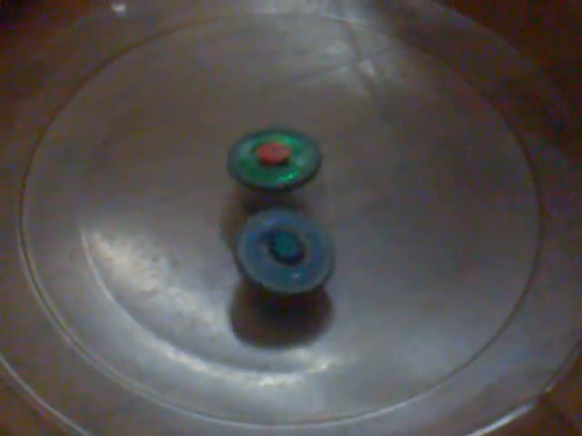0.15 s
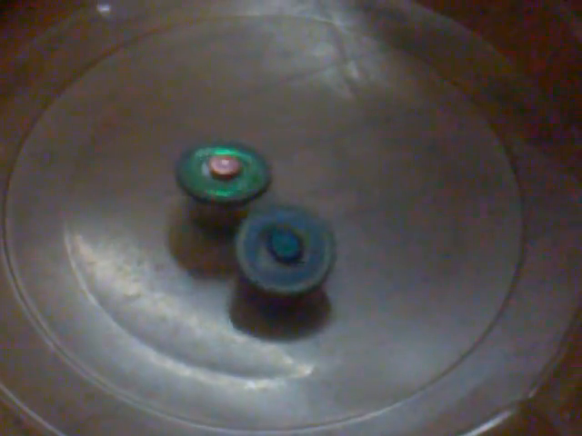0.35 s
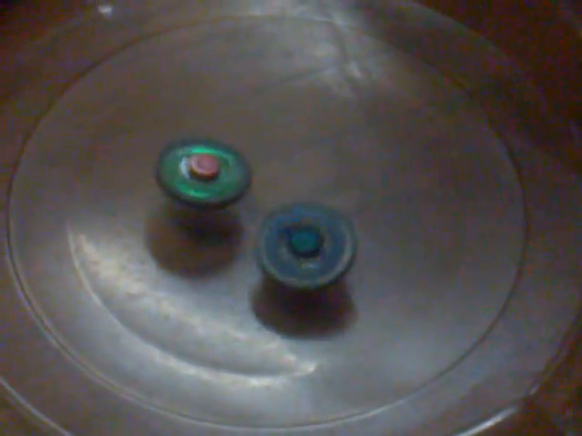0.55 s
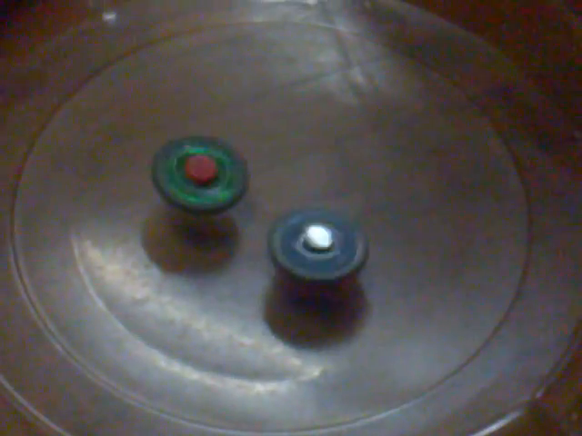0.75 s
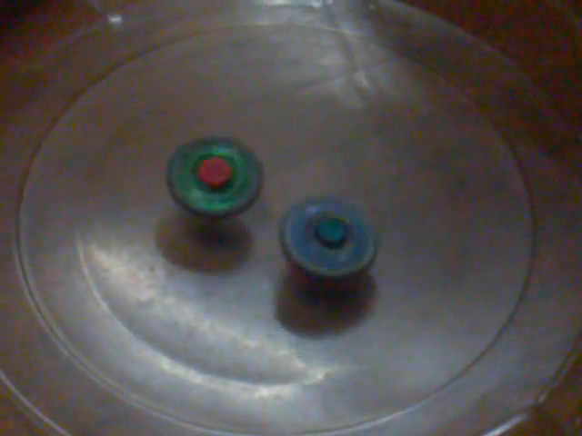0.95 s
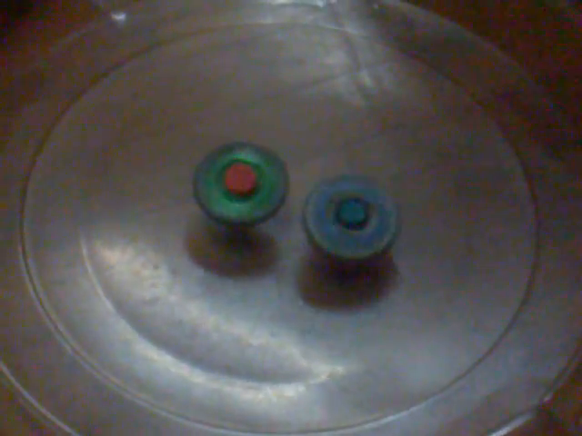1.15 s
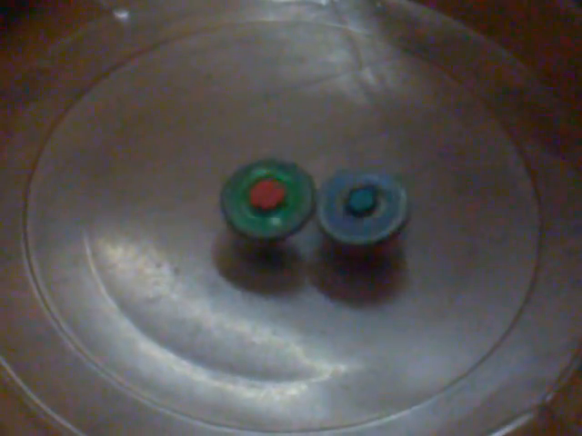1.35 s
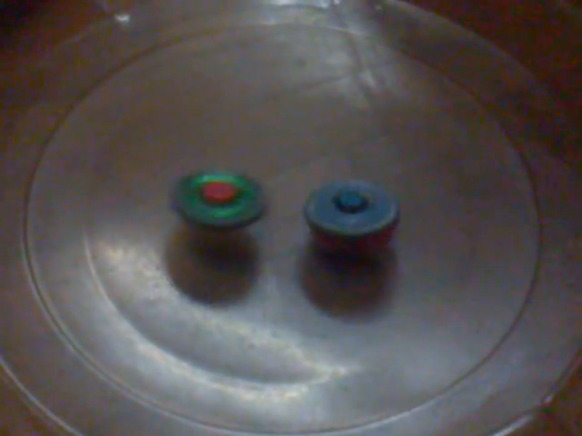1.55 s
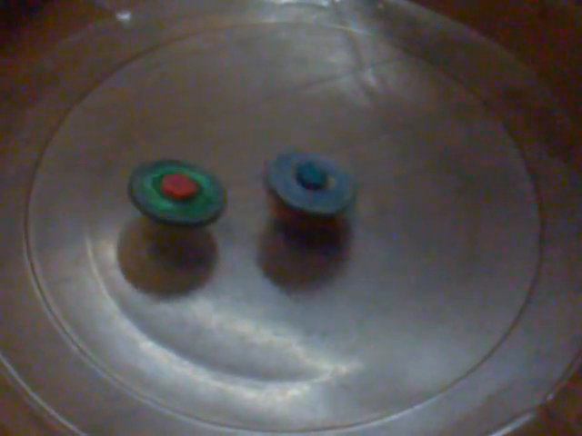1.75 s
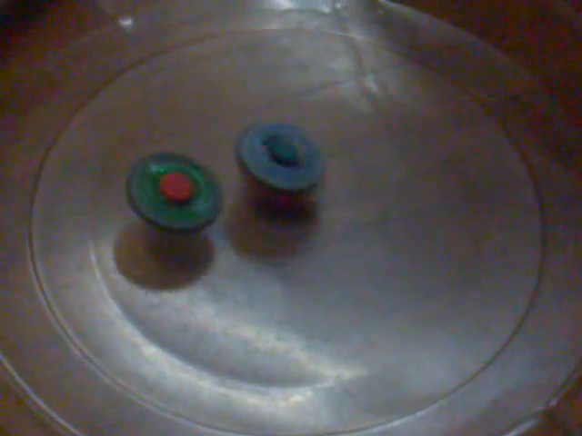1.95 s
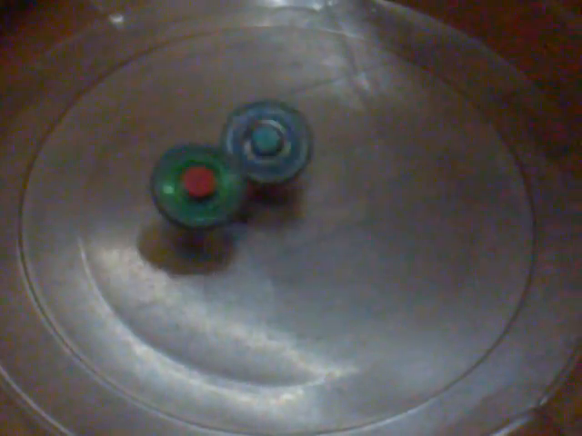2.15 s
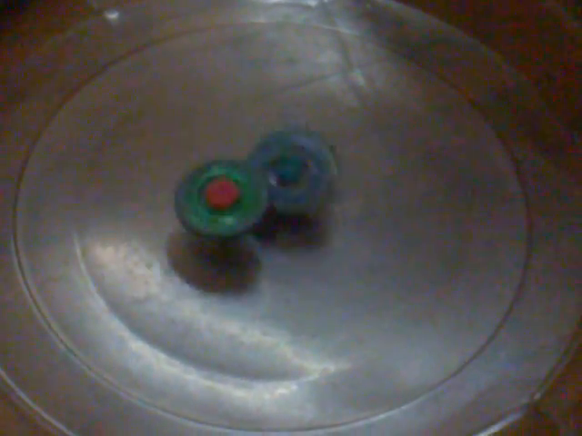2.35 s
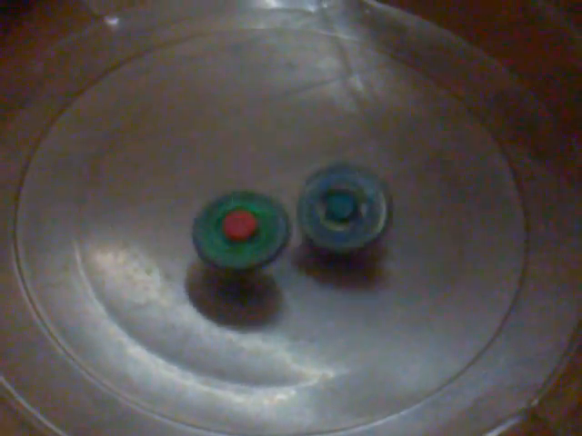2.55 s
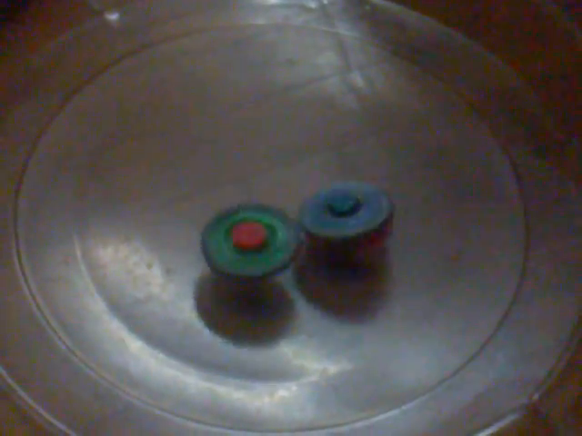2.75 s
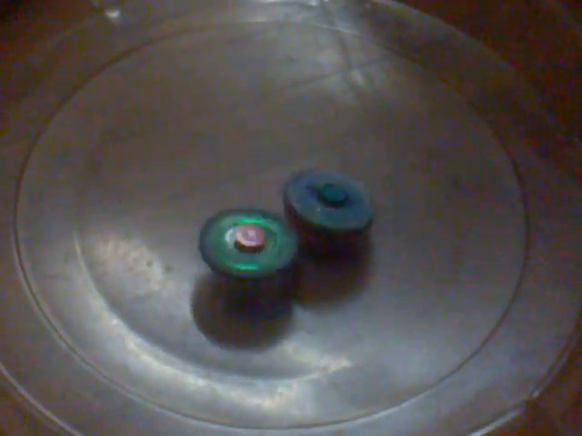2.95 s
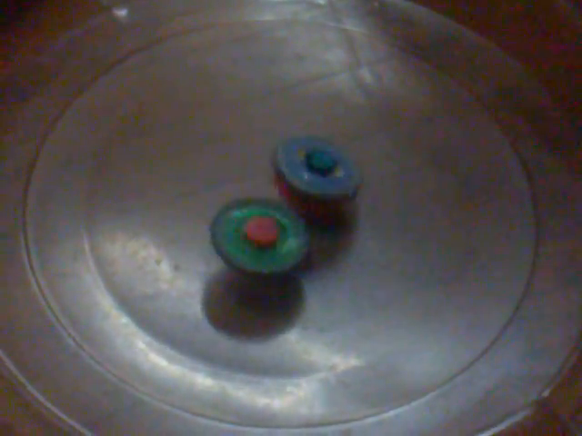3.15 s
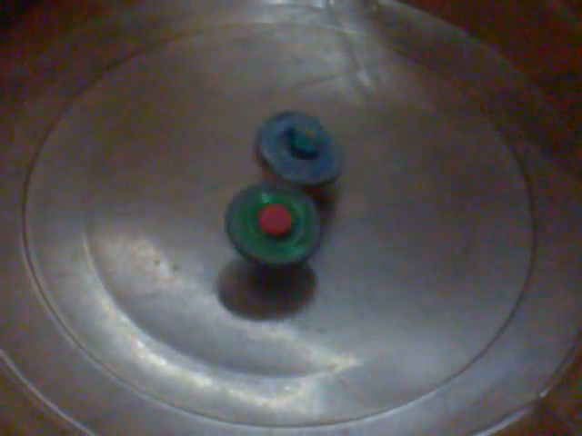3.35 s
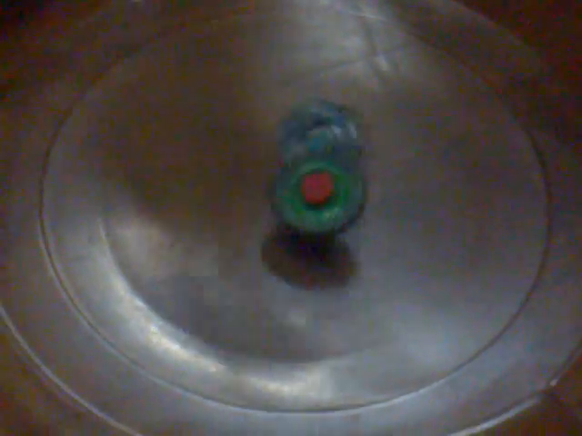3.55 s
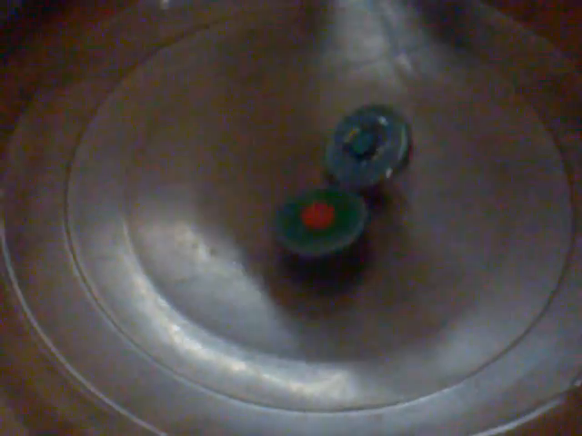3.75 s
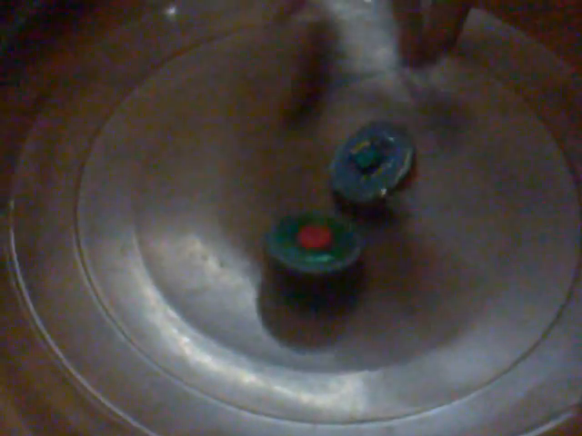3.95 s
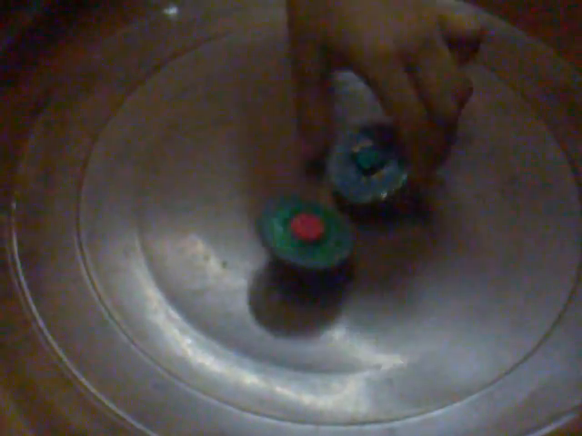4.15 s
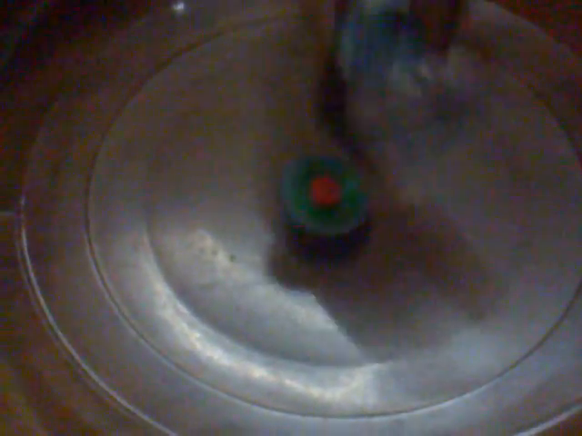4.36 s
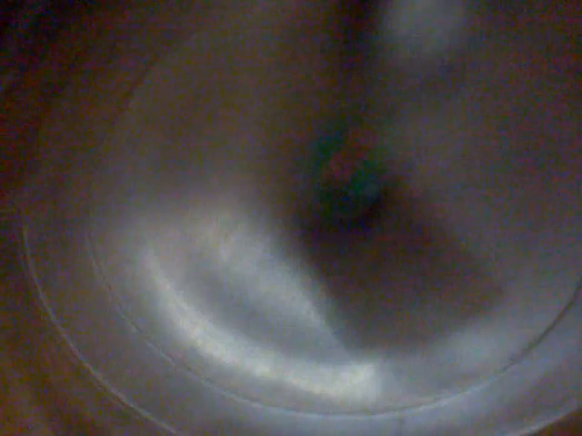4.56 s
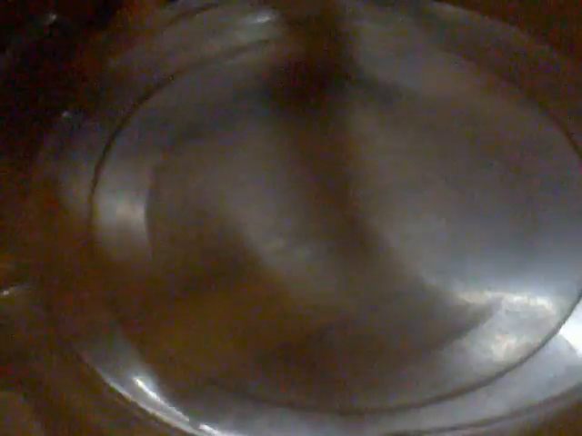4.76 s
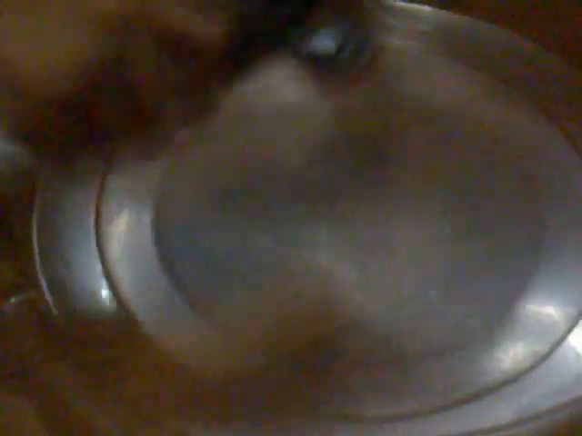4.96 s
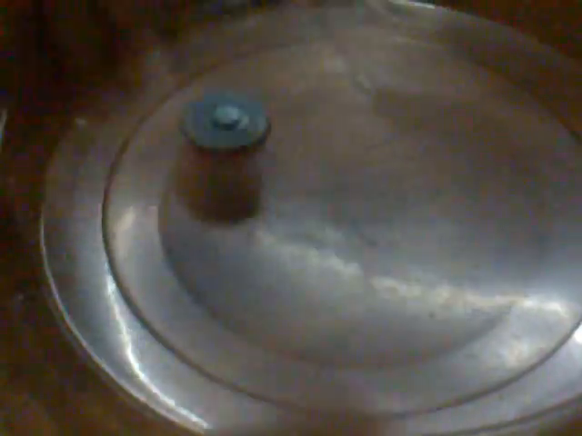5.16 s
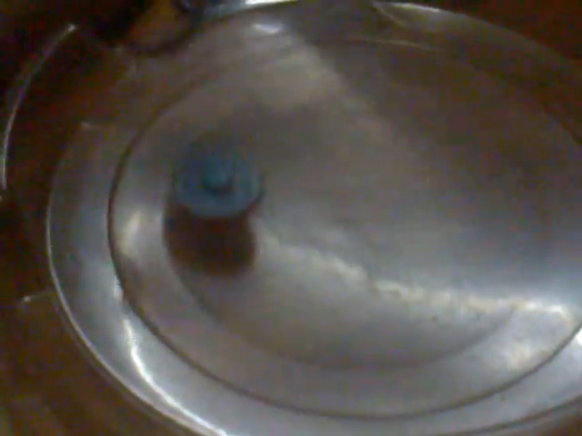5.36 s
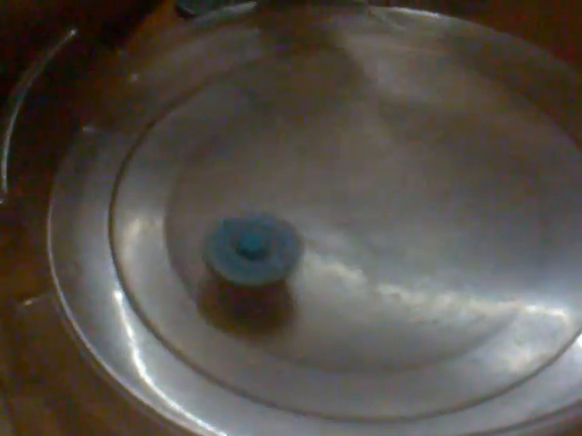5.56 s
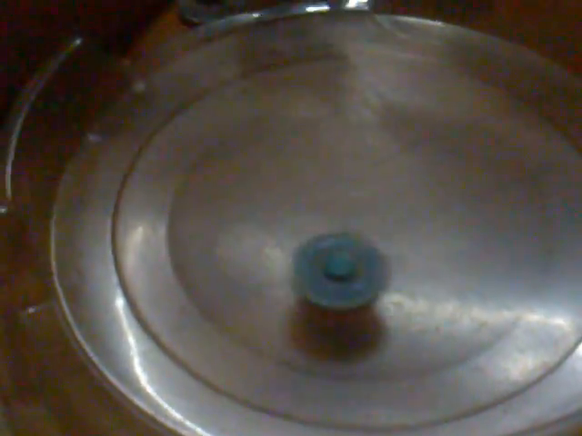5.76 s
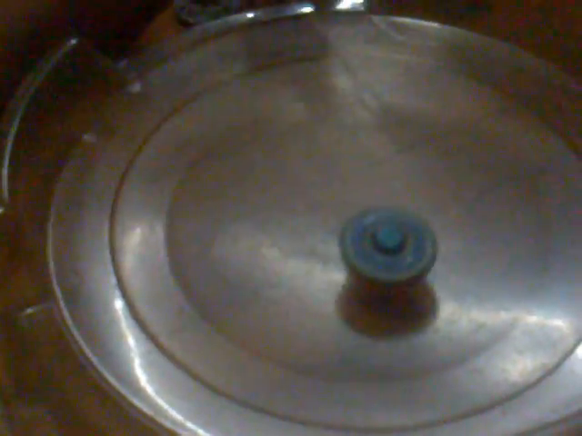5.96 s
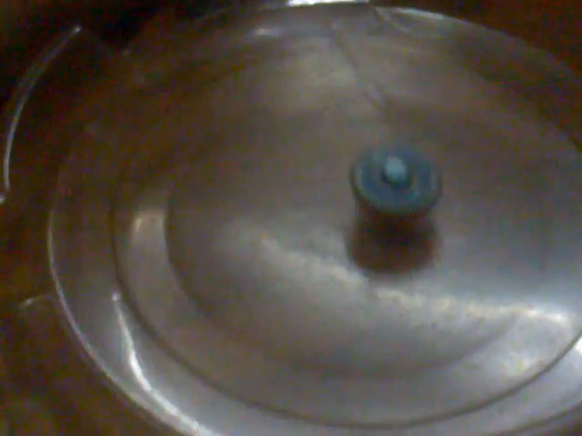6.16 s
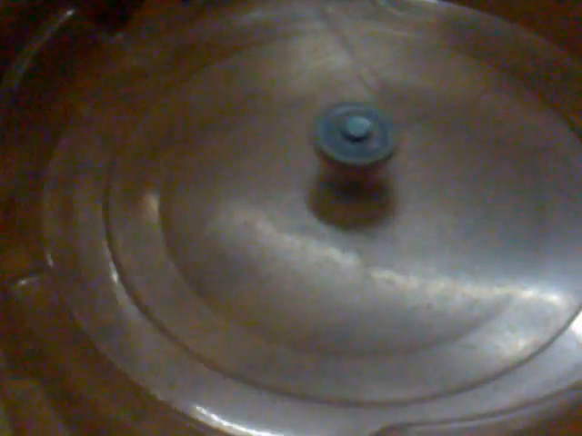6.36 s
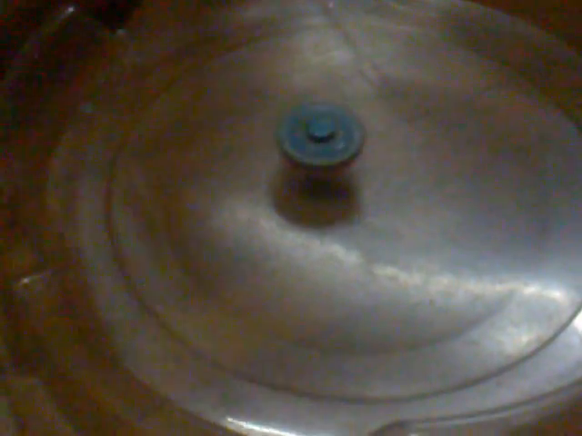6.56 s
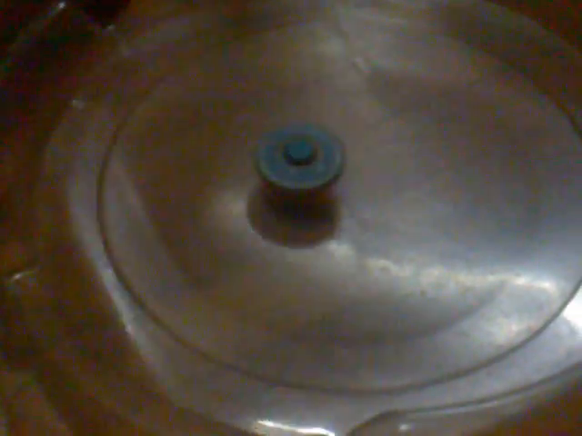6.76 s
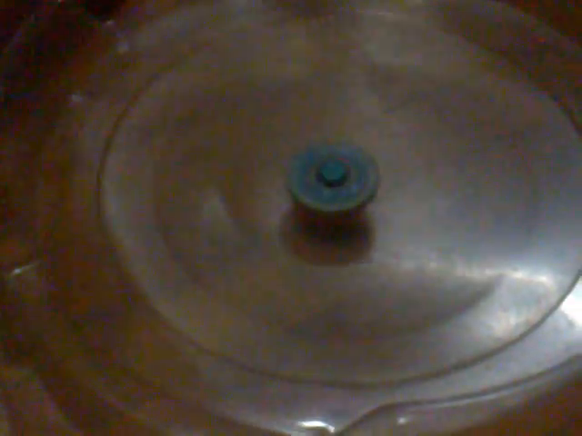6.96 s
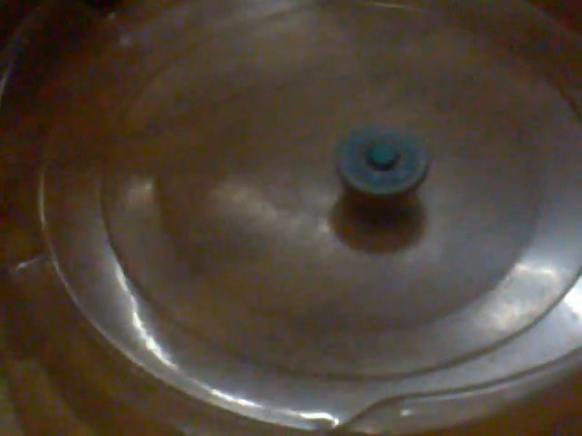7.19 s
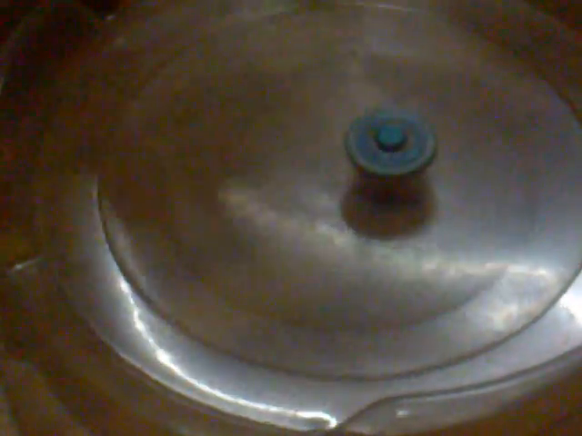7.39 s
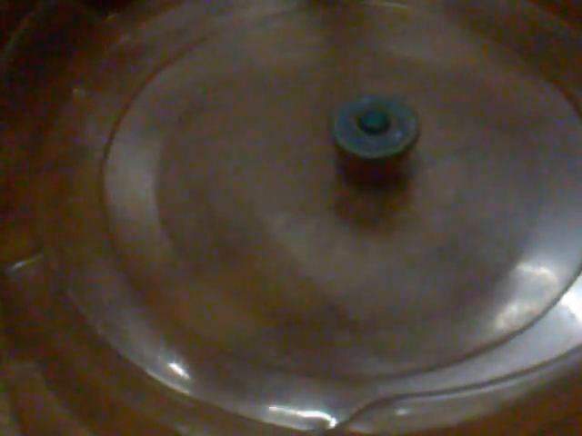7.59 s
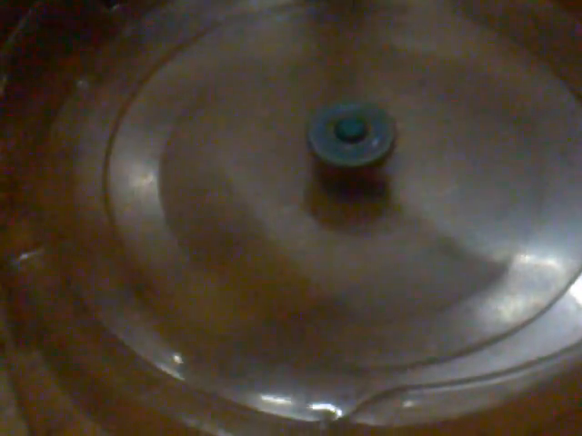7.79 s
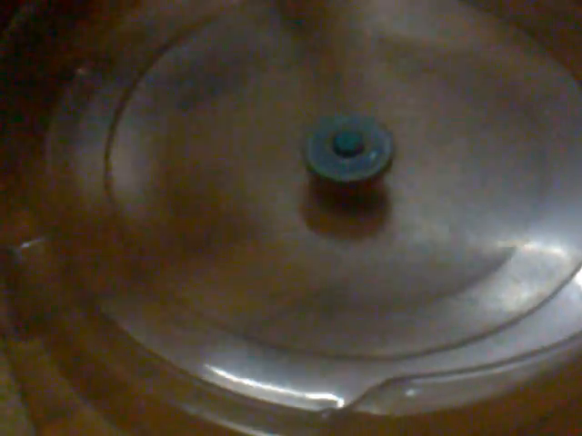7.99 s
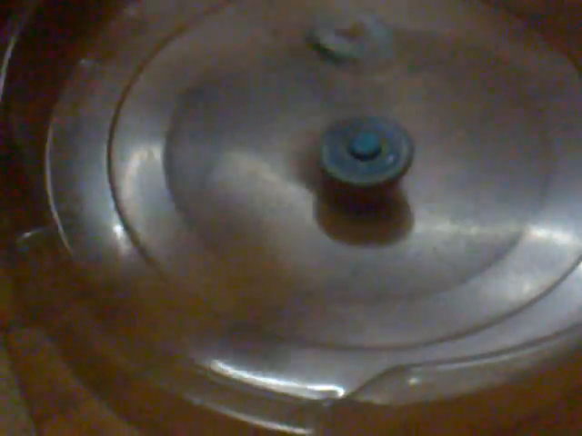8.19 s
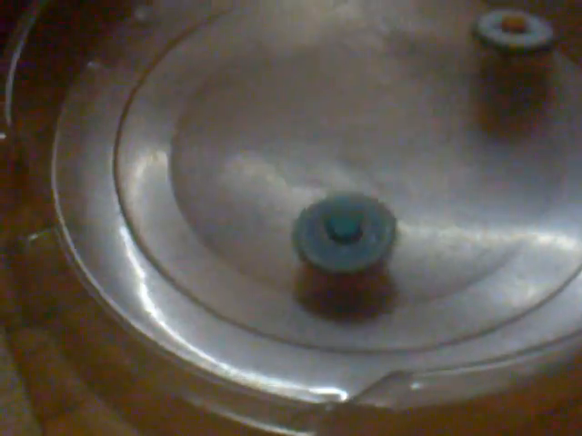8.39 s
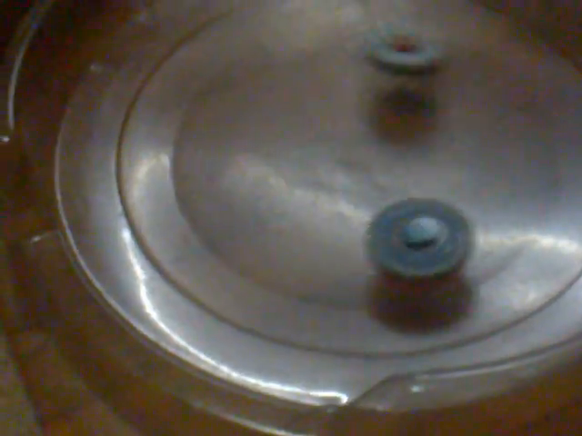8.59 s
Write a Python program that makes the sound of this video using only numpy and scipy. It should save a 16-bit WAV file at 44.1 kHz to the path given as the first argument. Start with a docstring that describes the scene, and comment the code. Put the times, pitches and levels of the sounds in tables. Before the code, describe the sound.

Two plastic spinning tops tick and scrape faintly around a wide bowl in a quiet room, heard from just above. At about 1.5 seconds they clash in a quick flurry of sharp clacks that trails into light taps. Another flurry with harder scraping comes at 2.4 seconds, then scattered ticks, and a third at 3.6. A hand bumps in with a dull thud at 4.5, followed by a brief silence.

At 5.1 seconds a ripcord gives a short, loud rasp through a launcher. A top lands, bounces rapidly and settles into a faint low hum and whirr. Small plastic clicks sound around 5.8, 6.4 and 7 seconds as the launcher is reloaded. At 8.1 a second rasp throws in another top, which lands, strikes with a loud crack and bright metallic ping near 8.4, and clatters around the bowl.

```python
"""A wide bowl in a quiet room, one microphone just above it. Two tired spinning tops scrape round and clash
rim on rim in quick flurries until a hand bumps in to pick one out. After a short silence a ripcord rasps
over a launcher's gear and throws a top in: it lands, bounces and hums on its off-centre tip while the
launcher clicks and is loaded again. A second top is launched, lands, strikes with a bright ping of its
metal weight ring and clatters round the bowl."""
import sys
import numpy as np
from scipy import signal
from scipy.fft import rfft, irfft
from scipy.io import wavfile
from scipy.ndimage import uniform_filter1d, minimum_filter1d

SR = 44100
rng = np.random.default_rng(int(sys.argv[2]) if len(sys.argv) > 2 else 0)


def digitize_waveform(pressure):
    """Quantize a signal to 16-bit integers and store it at the path in sys.argv[1].

    Rows of a 2-D input are taken as channels; values are limited to [-1, 1].
    """
    field = np.atleast_2d(pressure).T
    bounded = np.clip(field, -1, 1)
    quanta = np.round(bounded * 32767).astype(np.int16)
    wavfile.write(sys.argv[1], SR, quanta)


N = 380583
PAUSE_S = (4.625, 4.845)  # everything falls silent between these times

# Rim against rim; the faster the rims slip, the higher they chirp.
# Each row: start in seconds, level in dB, extra treble in dB, chirp pitch in Hz.
CLASHES = [(1.447, -31.5, 12.5, 1690), (1.477, -15, 15, 2680), (1.491, -12, 13.5, 2180),
           (1.507, -4.5, 12, 1465), (1.54, -6.5, 10.5, 1966), (1.551, -13, 5, 1510), (1.56, -12, 8.5, 1484),
           (1.587, -11.5, -2.5, 1386), (1.605, -25.5, 1, 1270), (1.622, -18.5, -3.5, 2470),
           (1.647, -28, -10.5, 1500), (1.704, -26.5, -3, 1540), (1.718, -29.5, -18, 1390),
           (1.739, -31.5, 0.5, 1934), (1.759, -31, -2, 1450), (1.796, -36.5, 1, 1300),
           (1.841, -32.5, -2, 1420), (1.892, -35, -3.5, 1580), (2.334, -32.5, 7.5, 1570),
           (2.343, -26, 10, 1690), (2.353, -17, 11, 3050), (2.366, -6, 5, 1780), (2.386, -19, -1, 1730),
           (2.404, -13.5, -8, 1505), (2.428, -19, 1, 2150), (2.447, -19, -0.5, 2095),
           (2.465, -11.5, -8, 1420), (2.485, -14, -6.5, 1510), (2.512, -22.5, -6, 2080),
           (2.532, -21.5, -10.5, 1450), (2.555, -23.5, -6.5, 2030), (2.57, -22.5, -5, 1730),
           (2.655, -31.5, -10, 1480), (2.663, -32, -12, 1490), (2.812, -31.5, 0, 1526),
           (2.822, -25.5, -15, 1990), (3.093, -32, -10.5, 1685), (3.106, -33, -2.5, 1375),
           (3.203, -24, -7, 1476), (3.218, -21.5, -11.5, 2110), (3.235, -25.5, -7, 1430),
           (3.329, -28.5, -3.5, 1800), (3.345, -25, -8.5, 2190), (3.361, -27, -1.5, 2180),
           (3.375, -30, -1.5, 2570), (3.591, -27.5, -7, 1460), (3.616, -20.5, 12, 2300),
           (3.63, -2, -3, 1614), (3.643, -11, 18, 3170), (3.649, -15, 4, 1720), (3.669, -10, -2.5, 1503),
           (3.679, -14.5, 18.5, 2470), (3.697, -7, 0, 2250), (3.829, -36, -22, 1550),
           (3.844, -31.5, -15, 1510), (3.872, -32, -21, 1460), (4.023, -43, -3, 1760),
           (4.273, -35, -6.5, 1283), (4.523, -30.5, -10, 1534), (4.59, -38, -15, 1586)]
# Bowl and room ringing on. Each row: frequency in Hz, seconds to fall 60 dB.
RING_TIMES = [(80, 0.92), (250, 0.083), (700, 0.22), (2000, 0.2), (5000, 0.23), (13000, 0.12)]


def undb(db):
    """Decibels to gain."""
    return 10 ** (np.asarray(db) / 20)


def unit(x):
    """Scale to rms 1."""
    return x / np.sqrt(np.mean(x ** 2))


def curve(rows, column=1, outside=None):
    """One column of a table, joined by straight lines in time."""
    rows = np.array(rows)
    return np.interp(np.arange(N) / SR, rows[:, 0], rows[:, column], outside, outside)


def between(start_s, end_s):
    """1 between two times, 0 outside."""
    t = np.arange(N) / SR
    return 1. * ((t > start_s) & (t < end_s))


def swells(rows, steady_db=-200):
    """Gain of swells over a floor. Each row: crest in seconds, dB, seconds to rise and to fall 20 dB."""
    t = np.arange(0, N, 32) / SR
    power = undb(steady_db) ** 2
    for s, db, rise_s, fall_s in rows:
        power = power + undb(db - 20 * np.maximum((s - t) / rise_s, (t - s) / fall_s)) ** 2
    return np.interp(np.arange(N) / SR, t, np.sqrt(power))


def at_hz(points, hz):
    """Read (Hz, value) points on a log-frequency axis."""
    f, value = np.transpose(points)
    return np.interp(np.log(hz + 1), np.log(f), value)


def colour(x, points, size=4096):
    """Causal filter with the given (Hz, dB) spectrum."""
    gain = undb(at_hz(points, np.arange(size // 2 + 1) * SR / size))
    cepstrum = irfft(np.log(gain))
    cepstrum[1:size // 2] *= 2  # fold to minimum phase
    cepstrum[size // 2 + 1:] = 0
    return signal.fftconvolve(x, irfft(np.exp(rfft(cepstrum))))[:len(x)]


def add(track, s, sound):
    """Mix a sound into the track at s seconds."""
    start = int(s * SR)
    track[start:start + len(sound)] += sound[:N - start]


def pulses(hz, scatter_db, jitter):
    """One click per cycle, each with its own size and a slip in time."""
    turns = np.cumsum(hz) / SR
    cycle = np.arange(1, int(turns[-1]))
    slip, force = rng.standard_normal((len(cycle), 2)).T
    out = np.zeros(N)
    where = np.searchsorted(turns, cycle + jitter * slip).clip(0, N - 1)
    out[where] = undb(scatter_db * force.clip(-2, 2))
    return out


def bursts(clicks, decay_s):
    """Every click lets off its own short burst of contact noise."""
    envelope = signal.lfilter([1], [1, -np.exp(-1 / (decay_s * SR))], clicks)
    return unit(envelope * rng.standard_normal(N))


def ring_on(x, bass_db, treble_db):
    """Add the dense tail of bowl and room; the lowest bands ring longest."""
    t = np.arange(SR) / SR
    edges = np.geomspace(40, 18000, 17)
    tail = 0
    for lo, hi in zip(edges, edges[1:]):
        hz = np.sqrt(lo * hi)
        bandpass = signal.butter(3, [lo, hi], "band", fs=SR, output="sos")
        band = signal.sosfilt(bandpass, rng.standard_normal(SR))
        band *= undb(-60 * t / at_hz(RING_TIMES, hz))
        band *= 1 - np.exp(-t / 0.0066)
        wet = undb(at_hz([(400, bass_db), (3000, treble_db)], hz))
        tail = tail + wet * band * np.sqrt(2 * (hi - lo) / SR / np.sum(band ** 2))
    return x + signal.fftconvolve(x, tail)[:N]


def air():
    """Room tone: a low rumble and faint steady hiss."""
    # Still air. Each row: frequency in Hz, relative level in dB.
    spectrum = [(15, -32), (25, -5.5), (73, -5.5), (322, -15.5), (378, -20), (684, -17.5), (1170, -28),
                (1300, -24.5), (4150, -33), (15500, -32)]
    return unit(colour(rng.standard_normal(N), spectrum)) * undb(-64.5)


def chirp(hz, rise_s, rough, size=4096):
    """A ridged edge slides past: a rough tone with one overtone swells and fades in milliseconds."""
    age = np.arange(size) / SR / rise_s
    waver = unit(uniform_filter1d(rng.standard_normal(size), size=40))
    phase = 2 * np.pi * np.cumsum(hz * (1 + rough * waver)) / SR
    return age ** 2 * np.exp(-2 * age) * (np.sin(phase) + undb(-10.5) * np.sin(1.55 * phase))


def ticks(clicks, hz, rasp_db):
    """Every click is a soft scratch with a short, rough chirp in it; between them the tip rasps on."""
    tones, where = np.zeros(N), np.flatnonzero(clicks)
    scatter, wander = rng.standard_normal((len(where), 2)).T
    pitch = hz * np.exp(0.08 * (scatter + unit(uniform_filter1d(wander, size=10))))
    for i, chirp_hz in zip(where, pitch):
        add(tones, i / SR, clicks[i] * chirp(chirp_hz, rise_s=0.002, rough=0.11, size=768))
    # A tip scratching the bowl. Each row: frequency in Hz, relative level in dB.
    spectrum = [(50, -14.5), (140, -1.5), (400, 0), (1000, -0.5), (1600, 0.5), (2400, -9), (3300, -13.5),
                (4500, -18), (8000, -24), (15000, -32)]
    scratch = bursts(uniform_filter1d(clicks, size=130), decay_s=0.0045)
    scrape = unit(colour(scratch + undb(rasp_db) * rng.standard_normal(N), spectrum))
    return unit(scrape + undb(1) * unit(tones))


def scraping():
    """Two tired tops graze the bowl in uneven ticks; each clash sets them wobbling and scraping harder."""
    # The tops lean over and rub. Each row: crest in seconds, relative level in dB, rise and fall in seconds.
    rubs = [(.17, -61.5, .25, 0.35), (.42, -60, 0.29, 0.42), (1.28, -68, .3, .5), (2.3, -42, .17, 0.22),
            (3.57, -52.5, 0.5, 0.28), (4.33, -54, 0.23, .4), (4.6, -48, 0.24, .1)]
    rise_s, settle_s = 0.019, 0.21
    wobbles = [(s + rise_s, -36 + 0.72 * db, rise_s / 2, settle_s) for s, db, *_ in CLASHES]
    pressure = swells(rubs + wobbles, steady_db=-76.5) * between(0, PAUSE_S[0])
    grazes = ticks(pulses(np.full(N, 42.), scatter_db=3.5, jitter=0.2), hz=2020, rasp_db=-5)
    return undb(-0.16) * ring_on(grazes * pressure, bass_db=6, treble_db=-8)


def crack(decay_s, size=4096):
    """A quick rise and a few milliseconds of dense, strongly damped vibration, even in spectrum."""
    t = np.arange(size) / SR
    envelope = (1 - np.exp(-t / 0.00041)) * np.exp(-(t / decay_s) ** 0.82)
    spectrum = rfft(np.sign(rng.standard_normal(size)) * envelope)
    even = irfft(spectrum / np.sqrt(uniform_filter1d(np.abs(spectrum) ** 2, size=size // 100)))
    return even * (np.arange(size) < size // 2)


def body_ring(size=4096):
    """Each contact shakes the plastic body's modes with its own strength; the spin shifts them a little."""
    # A top's body. Each row: frequency in Hz, relative level in dB, seconds to fall 60 dB.
    modes = [(1517, -1.5, 0.03), (2170, 4.5, 0.018), (2505, -2.5, 0.085), (3150, 4, 0.021),
             (4470, -8.5, 0.033), (7100, -13, 0.026), (9270, -19, .09)]
    t, out = np.arange(size) / SR, 0
    for (hz, db, t60), (force, shift) in zip(modes, rng.standard_normal((len(modes), 2))):
        mode = np.sin(2 * np.pi * hz * (1 + 0.029 * shift) * t) * undb(-60 * t / t60)
        out = out + undb(db + 3.1 * force) * mode
    return out * (1 - np.exp(-t / 0.00062))  # the rim takes a moment to push the body into motion


def contact(db, treble_db, bass_db, spectrum, decay_s, body_db, slide=0):
    """One blow: a crack, the ringing body and any slide, shaded in bass and treble."""
    shade = [(500, bass_db), (1400, 0), (3500, 0), (6000, 0.6 * treble_db), (11000, 1.25 * treble_db)]
    bite = unit(colour(crack(decay_s), spectrum))
    hit = colour(bite + undb(body_db) * unit(body_ring()) + slide, shade)
    crest = np.sqrt(2 * uniform_filter1d(hit ** 2, size=88).max())  # over the loudest 2 ms
    return hit * undb(db) / crest


def snaps():
    """Plastic parts click, each with its own share of room."""
    # Single snaps. Each row: start in seconds, then relative level, extra treble and room send in dB.
    events = [(0.529, -47, -28, -5), (0.745, -52.5, -17, -10), (2.886, -36, 15, 8.5),
              (3.325, -31.5, -2.5, -7), (3.493, -20, 2, -11), (4.497, -24, -6, -2), (4.997, -29.5, -3, 6),
              (5.022, -31, 0, 7.5), (5.758, -15.5, 12.5, 5.5), (6.381, -24, -5, -5), (6.466, -19, -3.5, -1),
              (7.013, -35, -8, 16), (7.021, -18.5, 2, -1.5), (7.666, -45, 1, 6), (8.033, -24.5, -6, -4),
              (8.037, -19.5, 3, 0.5), (8.354, 3, 13.5, 1)]
    # Snapping plastic. Each row: frequency in Hz, relative level in dB.
    spectrum = [(100, -18.5), (700, -12), (1400, 1.5), (2300, 6), (3200, -0.5), (4400, -2.5), (5300, -10.5),
                (7000, -17), (15000, -34.5)]
    hits, sent = np.zeros(N), np.zeros(N)
    for s, db, treble_db, room_db in events:
        click = contact(db, treble_db, 0, spectrum, decay_s=0.0011, body_db=-9)
        add(hits, s, click)
        add(sent, s, click * undb(room_db))
    room = ring_on(sent, bass_db=1, treble_db=-9.5) - sent
    return undb(-2.5) * (hits + room)


def clashes():
    """The rims bite with a crack and slide with a chirp; the kick goes through the tips into the bowl."""
    # Colliding rims. Each row: frequency in Hz, relative level in dB.
    spectrum = [(50, -9), (200, 3), (680, 3.5), (1050, -2), (1450, 2), (2150, 0), (3150, -4.5),
                (3800, -7.5), (5500, -13), (7100, -15.5), (8500, -20), (15500, -24.5)]
    hits = np.zeros(N)
    for s, db, treble_db, hz in CLASHES:
        slide_db = -1.5 - 0.2 * db  # light touches mostly slide
        slide = undb(slide_db) * unit(chirp(hz, rise_s=0.0026, rough=0.08))
        bass_db = -0.28 * treble_db  # a bright, glancing blow barely moves the bowl
        add(hits, s, contact(db, treble_db, bass_db, spectrum, decay_s=0.0047, body_db=-2.5, slide=slide))
    return ring_on(hits, bass_db=-1.5, treble_db=-9) + bowl_ring(hits, db=7.5)


def bowl_ring(x, db):
    """Blows on the bowl set its low modes booming."""
    # The bowl's modes. Each row: frequency in Hz, relative level in dB.
    modes = [(144, -4), (270, -3), (494, 1.5), (641, -3), (777, 2.5), (989, -6)]
    t, ring = np.arange(SR) / SR, 0
    for hz, mode_db in modes:
        mode = np.sin(2 * np.pi * hz * t) * undb(-60 * t / at_hz(RING_TIMES, hz))
        ring = ring + undb(db + mode_db) * mode / np.abs(mode).sum()
    return signal.fftconvolve(x, ring)[:N]


def tinks():
    """A small hard part rings in a close pair of high modes, damped by whatever holds it."""
    # Clicks that shake the part. Each row: start in seconds, level in dB, seconds to fall 60 dB.
    events = [(2.886, -45, 0.16), (5.759, -4.5, 0.012), (7.021, -38, .012)]
    out, t = np.zeros(N), np.arange(SR // 4) / SR
    pair = np.mean([np.sin(2 * np.pi * hz * t) for hz in (4200, 4560)], axis=0)
    for s, db, t60 in events:
        add(out, s, undb(db) * pair * undb(-60 * t / t60))
    return ring_on(out, bass_db=-13, treble_db=-15)


def bumps():
    """The hand reaches in with dull, damped thuds, each a single soft push."""
    # Soft bumps. Each row: start in seconds, relative level in dB.
    events = [(4.499, -18.5), (4.583, -38.5)]
    # A dull thud. Each row: frequency in Hz, relative level in dB.
    spectrum = [(20, -8.5), (60, -3), (130, 0.5), (300, -10), (800, -20.5), (3000, -57.5), (15000, -65.5)]
    out = np.zeros(N)
    thud = colour(signal.unit_impulse(4096), spectrum)
    for s, db in events:
        add(out, s, thud * undb(db) / np.abs(thud).max())
    return undb(3) * ring_on(out, bass_db=-13.5, treble_db=10)


def launcher():
    """The ripcord's teeth race over the gear, louder and brighter as the pull speeds up."""
    # Ripcord pulls. Each row: start in seconds, length in seconds, relative level in dB at full speed.
    pulls = [(5.094, 0.053, -0.5), (8.115, 0.054, -3.5)]
    # Teeth on the gear. Each row: frequency in Hz, relative level in dB.
    spectrum = [(100, -19), (500, -23.5), (1100, -8.5), (2000, -3), (2300, 6), (2700, -1.5), (3250, -2),
                (3800, -7.5), (5200, -15), (8000, -22), (15500, -32.5)]
    out = 0
    for s, length_s, db in pulls:
        # Each row: time in seconds, relative level in dB, treble emphasis in dB.
        pull = [(s - 0.045, -41, -12.5), (s, -10.5, -12.5),
                (s + length_s, 0, 9), (s + length_s + 0.076, -41, 0)]
        teeth = bursts(pulses(np.full(N, 330.), scatter_db=0.5, jitter=0.8), decay_s=0.003)
        rasp = unit(colour(teeth, spectrum))
        treble = colour(rasp, [(2800, -21), (5000, -3.5)]) * (undb(curve(pull, column=2)) - 1)
        catch_and_slip = undb(1.6 * unit(uniform_filter1d(rng.standard_normal(N), size=300)))
        out = out + (rasp + treble) * catch_and_slip * undb(db + curve(pull, outside=-200))
    return ring_on(out, bass_db=-6, treble_db=-14.5)


def landings():
    """A falling top drums on the bowl in ever weaker bounces, and its tip skids after each landing."""
    # Drops on the bowl. Each row: start in seconds, relative level in dB, extra treble in dB,
    # number of bounces, gap between them in seconds.
    drops = [(5.198, 3, -2, 3, 0.012), (5.328, -7.5, 0, 1, 0.0082), (5.358, -14, 9.5, 0, .012),
             (5.394, -11, -2.5, 2, 0.013), (5.449, -18.5, -4, 0, 0.018), (8.213, 2, -2.5, 4, 0.017),
             (8.373, -3.5, 13, 1, 0.0067), (8.433, -5, -0.5, 2, 0.011), (8.476, -7.5, -4, 1, 0.012),
             (8.501, -0.5, -6, 3, 0.015), (8.585, -16.5, -2, 0, .012)]
    # A knock on the bowl. Each row: frequency in Hz, relative level in dB.
    spectrum = [(24, -49.5), (40, -34.5), (262, -5), (422, -5), (491, -4.5), (790, -3.5), (918, -5.5),
                (2440, -12.5), (3140, -23.5), (6330, -31), (16000, -49.5)]
    hits = np.zeros(N)
    for s, db, treble_db, bounces, gap_s in drops:
        for k in range(bounces + 1):
            blow = contact(db - 4 * k, treble_db, 0.5 * k, spectrum, decay_s=0.0079, body_db=-16.5)
            add(hits, s + k * gap_s, blow)
    rise_s, fall_s = 0.023, 0.1447
    skid = swells([(s + rise_s, db - 22, rise_s / 2, fall_s) for s, db, *_ in drops])
    hits += skid * unit(colour(rng.standard_normal(N), spectrum))
    return undb(-2) * ring_on(hits, bass_db=-9.5, treble_db=-15.5) + bowl_ring(hits, db=-2.5)


def threading():
    """Pushed gently back into the launcher, the cord only whispers over the gear."""
    # The push on the cord. Each row: time in seconds, level in dB.
    push = [(5.5, -78), (5.57, -47.5), (5.63, -66.5), (5.72, -51), (5.77, -54)]
    # The sliding cord. Each row: frequency in Hz, relative level in dB.
    spectrum = [(1500, -24), (3000, -8), (3700, -1), (4600, 0), (5400, -11), (12000, -36)]
    teeth = bursts(pulses(np.full(N, 130.), scatter_db=3, jitter=0.5), decay_s=0.008)
    return unit(colour(teeth, spectrum)) * undb(curve(push, outside=-200))


def spinning():
    """An off-centre tip pushes the bowl once a turn: a low hum, with a whirr of ticks when it drags."""
    # The fresh top's spin. Each row: time in seconds, turns per second.
    spin = [(5.7, 70.4), (6.15, 68), (6.45, 70.7), (6.8, 68.5), (7.06, 68.6), (7.4, 67), (8.1, 65.6)]
    # The tip bears down about twice a lap. Each row: crest in seconds, hum in dB,
    # relative ticking level in dB, rise and fall in seconds.
    presses = [(5.861, -52.5, -56.5, 0.5, 0.34), (6.479, -50, -51, 0.59, 0.15),
               (7.07, -53.5, -55, 0.11, 0.35), (7.72, -79, -64, .15, 0.26), (8.05, -64, -56.5, 0.17, .1)]
    # The humming bowl. Each row: frequency in Hz, relative level in dB.
    spectrum = [(40, -40), (70, 7), (140, 1.5), (210, -29), (280, 0), (490, -1), (750, -7), (1500, -7.5),
                (3000, -75), (12000, -79)]
    alone = between(5.5, 8.1)
    push = swells([(s, db, rise, fall) for s, db, _, rise, fall in presses], steady_db=-71.5) * alone
    grip = swells([(s, db, rise, fall) for s, _, db, rise, fall in presses], steady_db=-76.5) * alone
    turns = pulses(curve(spin), scatter_db=0.5, jitter=0.002)
    hum = unit(colour(turns, spectrum)) * push
    drag = ticks(pulses(curve(spin), scatter_db=2.5, jitter=0.04), hz=1767, rasp_db=0)
    whirr = ring_on(drag * grip, bass_db=-2, treble_db=-3)
    return ring_on(hum, bass_db=-3.5, treble_db=-1) + undb(2.3) * whirr


def pings():
    """Struck hard, a top's metal weight ring sings in a few clear modes."""
    # Blows on the ring. Each row: start in seconds, relative level in dB.
    blows = [(8.354, 2.5)]
    # The ring's modes. Each row: frequency in Hz, relative level in dB, seconds to fall 60 dB.
    modes = [(2486, 1, 0.019), (5400, -16, 0.16), (5470, -13, 0.19), (5600, -16, 0.21), (12600, -16, 0.079)]
    out, t = np.zeros(N), np.arange(SR // 2) / SR
    tone = sum(undb(db - 60 * t / t60) * np.sin(2 * np.pi * hz * t) for hz, db, t60 in modes)
    for s, db in blows:
        add(out, s, undb(db) * tone)
    return out


def scene():
    """Everything in and around the bowl, heard in mono from just above it."""
    struck = clashes() + landings() + snaps() + tinks() + bumps() + pings()
    rubbed = launcher() + threading() + scraping() + spinning()
    return (struck + rubbed + air())[None]


def limiter(x, ceiling_db, size):
    """Turn the gain down briefly round each peak that would pass the ceiling."""
    gain = np.minimum(1, undb(ceiling_db) / (np.abs(x) + 1e-9))
    return x * uniform_filter1d(minimum_filter1d(gain, size), size)


def record(dry):
    """The phone over the bowl limits the peaks, falls silent for a moment and cuts the highest treble."""
    running = uniform_filter1d(1 - between(*PAUSE_S), size=200)
    held = limiter(dry, ceiling_db=-2.3, size=50) * np.maximum(running, undb(-45))
    lowpass = signal.firwin(201, 15900, fs=SR)
    return signal.fftconvolve(held, lowpass[None], "same")


dry = scene()
out = record(dry)
digitize_waveform(out)
```